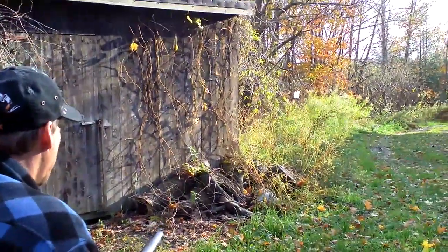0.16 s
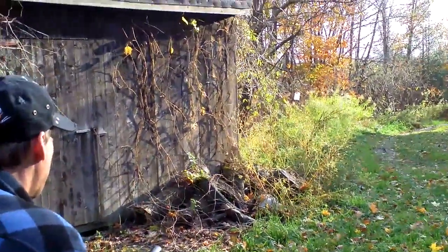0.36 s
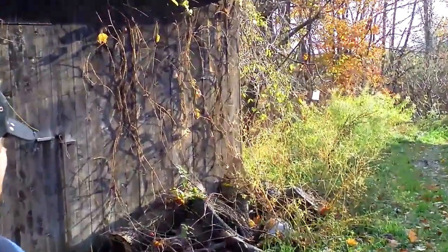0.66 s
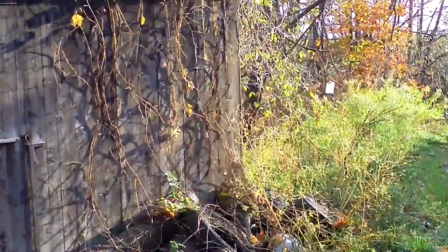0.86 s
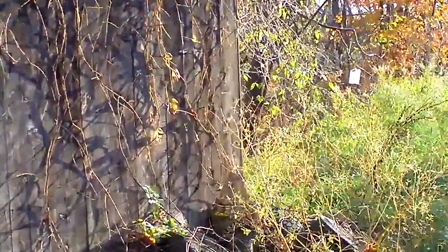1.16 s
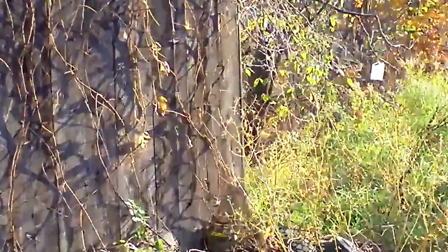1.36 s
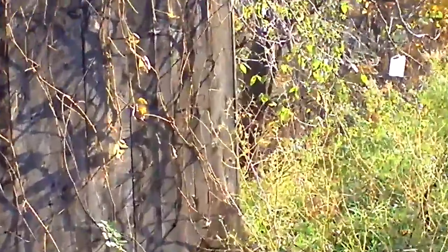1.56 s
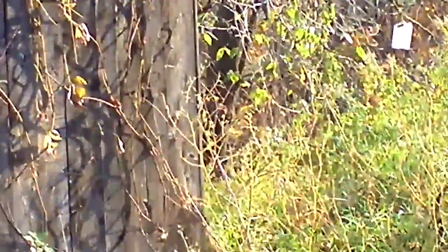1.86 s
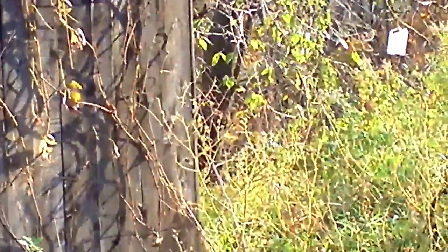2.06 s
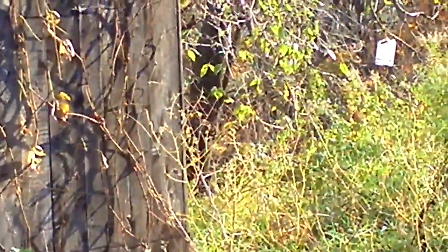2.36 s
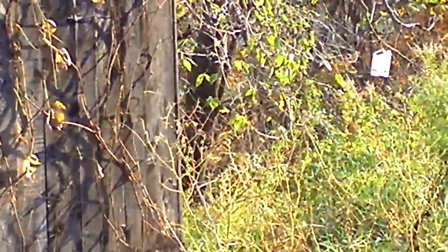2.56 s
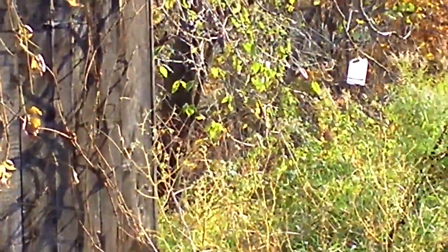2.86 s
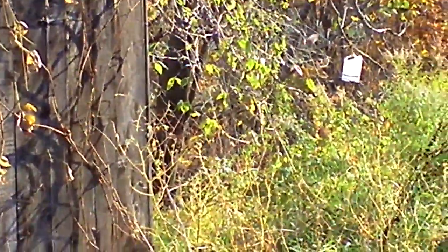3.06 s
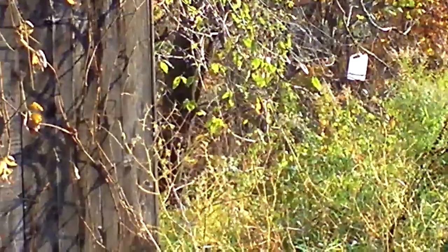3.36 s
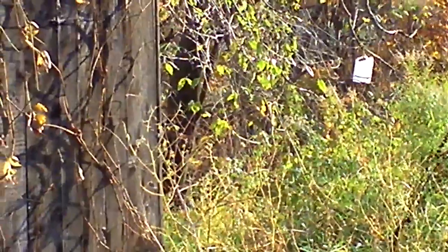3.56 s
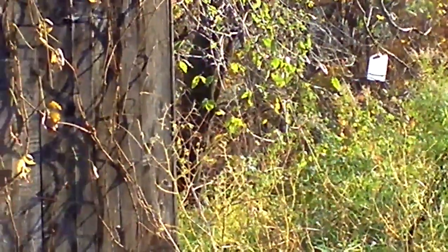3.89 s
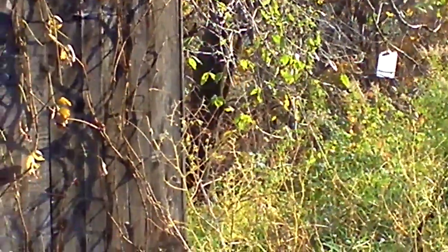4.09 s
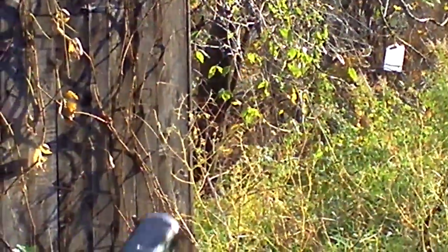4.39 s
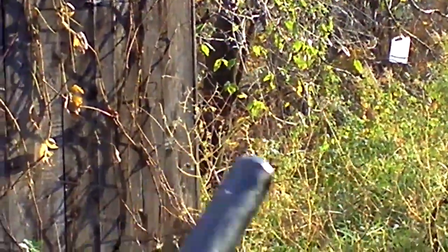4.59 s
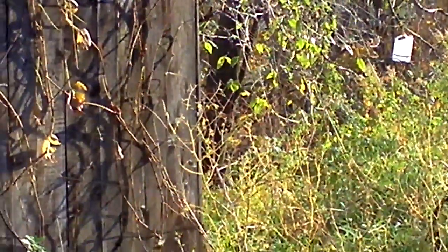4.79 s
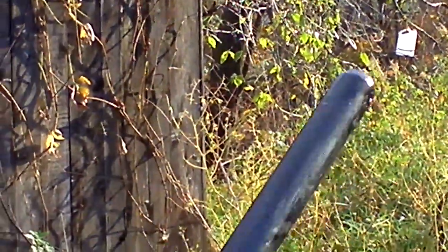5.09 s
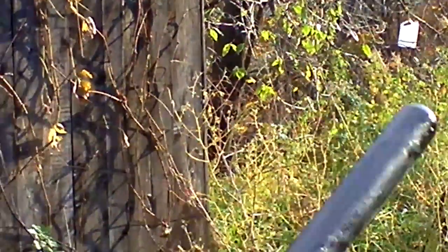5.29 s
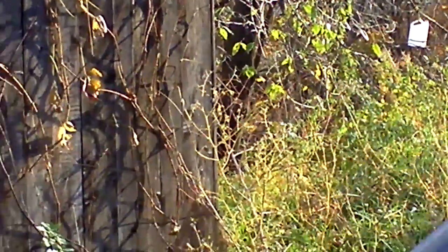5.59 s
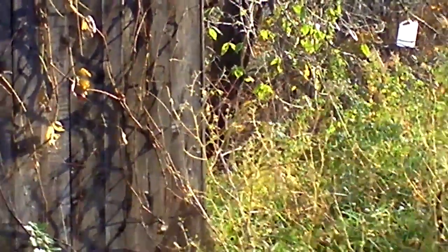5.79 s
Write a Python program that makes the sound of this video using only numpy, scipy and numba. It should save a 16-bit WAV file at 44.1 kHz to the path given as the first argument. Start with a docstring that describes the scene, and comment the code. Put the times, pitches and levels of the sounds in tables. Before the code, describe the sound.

Outdoors beside a wooden barn, a few small ticks sound over faint far traffic. About three seconds in, a homemade potato cannon fires with one sharp, loud bang. The barn and woods throw it back as a whoosh that grows duller, while the potato crashes briefly through dry brush. Soft rustles, scrapes and clicks follow close by. The microphone, a step away, overloads on the bang and dips in level.

```python
"""Potato cannon beside a barn

A home-made cannon fires a potato, which whoops up the barrel and pops out in a roar of gas.
A wooden barn and the woods throw the blast back as a whoosh that grows duller, and the potato
crashes through dry brush. Small parts tick and something rustles close by, over faint far traffic.
A small camera a step away is overloaded by the bang and turns itself down."""
import sys
import numpy as np
from scipy import signal
from scipy.fft import rfft, irfft, next_fast_len
from scipy.io import wavfile
from scipy.ndimage import uniform_filter1d
from numba import njit

SR = 44100
rng = np.random.default_rng(int(sys.argv[2]) if len(sys.argv) > 2 else 0)


def log_audio(samples):
    """Write samples as a 16-bit WAV file to the path given in sys.argv[1]."""
    # one column per channel
    frames = np.atleast_2d(samples).T
    # limit to full scale, then quantise
    limited = np.clip(frames, -1, 1)
    pcm = np.round(limited * 32767).astype(np.int16)
    wavfile.write(sys.argv[1], SR, pcm)


N = 261954
TIME = np.arange(N) / SR
POP_S = 3.0612  # the potato leaves the barrel


def undb(db):
    """Turn decibels into a multiplier."""
    return 10 ** (np.asarray(db) / 20)


def unit(x):
    """Scale x to an average (rms) size of 1."""
    return x / np.sqrt(np.mean(x ** 2))


def wobble(rate):
    """Glide to a new random value `rate` times a second."""
    k = max(int(SR / rate), 1)
    steps = np.repeat(rng.standard_normal(N // k + 1), k)
    return unit(uniform_filter1d(steps, k)[:N])


def curves(table):
    """Join each column's points over time; add a gate that is open from first row to last."""
    times, *columns = np.transpose(table)
    gate = (TIME > times[0]) & (TIME < times[-1])
    return [np.interp(TIME, times, c) for c in columns] + [gate]


def bursts(table):
    """Events rise, hold and fade: give their joint gain, and other columns led by the loudest."""
    start, db, rise, hold, fall, *columns = np.transpose(table)[:, :, None]
    level_db = db - rise * np.maximum(start - TIME, 0) - fall * np.maximum(TIME - start - hold, 0)
    power = undb(np.maximum(level_db, -200)) ** 2
    total = power.sum(axis=0)
    return [np.sqrt(total)] + [(power * c).sum(axis=0) / total for c in columns]


def coloured(x, colour):
    """Give the frequencies and spectrum of x, shaped by (f/Hz, level/dB) points."""
    size = next_fast_len(N, True)
    f = np.arange(1, size // 2 + 2) * SR / size
    hz, db = np.transpose(colour)
    return f, rfft(x, size) * undb(np.interp(np.log(f), np.log(hz), db))


def bands(x, colour):
    """Shape x, scale it to size 1 and split it into half octaves: (f/Hz, band) pairs."""
    f, spectrum = coloured(x, colour)
    spectrum = spectrum / np.std(irfft(spectrum))
    octave = np.clip(np.log2(f), 5, 14)
    return [(2. ** k, irfft(spectrum * np.clip(1 - 2 * abs(octave - k), 0, 1))[:N])
            for k in np.arange(5, 14.1, .5)]


@njit
def bandpass(x, hz, width):
    """Let through the sound near a pitch that may move."""
    y, band, low = np.empty(len(x)), 0., 0.
    for i in range(len(x)):
        g, k = np.tan(np.pi * hz[i] / SR), width[i] / hz[i]
        v = (band + g * (x[i] - low)) / (1 + g * (g + k))
        band, low, y[i] = 2 * v - band, low + 2 * g * v, k * v
    return y


@njit
def follow(x, attack, release):
    """Track the peaks of x, rising and falling at separate speeds."""
    y, level = np.empty(len(x)), 1e-6
    for i in range(len(x)):
        level += (abs(x[i]) - level) * (attack if abs(x[i]) > level else release)
        y[i] = level
    return y


def crackle(table, grain_db, patchy_db, width):
    """Bursts of tiny, uneven clicks around a moving pitch."""
    gain, hz = bursts(table)
    hz = np.clip(hz, 500, 12000)
    grains = rng.standard_normal(N) * undb(grain_db * rng.exponential(size=N) + patchy_db * wobble(150))
    return gain * unit(bandpass(bandpass(grains, hz, width * hz), hz, width * hz))


# Bass-to-treble balance of the background: f/Hz, level/dB
BACKGROUND_COLOUR = [(20, -1.5), (50, -9), (120, -0.5), (200, -1), (330, 0.5), (500, -3), (1000, -6),
                     (2000, -9.5), (4000, -13), (7000, -18.5), (11000, -15.5), (13000, -16), (15500, -5.5)]
def background(level_db=-47.5):
    """Far traffic rumbles and air hisses; the bass flickers more than the treble."""
    swell_db = 0.5 * wobble(0.88)
    parts = bands(rng.standard_normal(N), BACKGROUND_COLOUR)
    return undb(level_db) * sum(band * undb(swell_db + min(300 / hz, 1) ** .5 * wobble(6.7))
                                for hz, band in parts)


# Soft rustles and thin scrapes, both as: t/s, level/dB, rise/(dB/s), hold/s, fall/(dB/s), f/Hz
RUSTLES = [(4.5, -65.5, 146, 0.0012, 170, 3000), (4.552, -51, 427, 0.0011, 170, 3000),
           (4.596, -51, 500, .001, 600, 3500), (4.63, -58.5, 300, .07, 100, 5030),
           (4.74, -50, 120, 0.051, 800, 4570), (5.385, -49.5, 54, 0.0091, 330, 2640),
           (5.65, -47.5, 800, 0.043, 150, 3090), (5.755, -50, 145, 0.02, 198, 3550)]
SCRAPES = [(4.368, -58, 900, 0.0064, 900, 4770), (4.549, -57, 1502, 0.0092, 900, 2250),
           (4.73, -58, 300, .06, 903, 4900), (5.648, -54, 900, 0.111, 600, 2250),
           (5.778, -54, 900, .014, 900, 1150)]
def rustle_and_scrape():
    """Something rustles close by as the barrel swings, and something scrapes with a slight ring."""
    rustle = crackle(RUSTLES, grain_db=1.3, patchy_db=0.95, width=2.2)
    scrape = crackle(SCRAPES, grain_db=2.5, patchy_db=2.2, width=.22)
    return rustle + scrape


# Small parts ticking, twigs snapping and, at 3.136 s, the echo's first hard slap:
# t/s, level/dB, ring/Hz, second ring/Hz, second ring/dB, fade/s, thud/dB, thud/Hz, edge/dB, fuzz/dB
SMALL_HITS = [(0.24, -35, 2350, 3330, -1.5, 0.02, -3.5, 280, 0, 2.5),
              (0.2888, -37.5, 2550, 3250, 0, 0.033, -22, 600, -20, -2),
              (0.331, -48, 2520, 3300, 3, 0.011, 0, 400, -20, 2),
              (0.3857, -30.5, 1980, 2900, 3, 0.0078, -3, 510, 11, 12),
              (1.9144, -39.5, 1680, 2400, -7, 0.0079, -1.5, 516, -16, 8.5),
              (2.9583, -23, 3040, 4400, -14, 0.0067, -42, 670, -14, 4.5),
              (2.962, -35.5, 3080, 4300, -14, 0.055, -20, 670, -11, 5.5),
              (3.136, 0.5, 1420, 4360, -7, 0.022, -2.5, 470, -6, 1),
              (3.5861, -23.5, 3300, 6440, 2, 0.016, 12, 830, 8, 12),
              (3.6285, -17.5, 3799, 4470, 1, 0.013, -6, 800, -23, 2),
              (3.656, -27, 5500, 7200, -5, .01, -18, 900, -8, 8),
              (3.671, -22, 5800, 6400, -5, .01, 1, 900, -18, 1),
              (3.7585, -38, 5600, 6400, 0, .012, -20, 900, -20, 3),
              (3.7693, -36, 4200, 5400, 0, .012, -20, 900, -20, 3),
              (3.863, -26, 2300, 1600, 4, 0.011, -16, 600, -10, 6),
              (3.8862, -30, 4200, 5200, 5, 0.012, -24, 900, -20, 4),
              (4.0464, -37, 1070, 1490, -3, .03, 5, 429.4, -28, 5),
              (4.5015, -44, 2260, 3050, -1, 0.017, -15, 655, -25, 0),
              (4.548, -42.5, 2150, 2970, -5, 0.019, -3, 560, -16, 3),
              (4.593, -42, 2200, 3400, 0, 0.018, -21, 604, -6, 6),
              (5.58, -20.5, 2300, 3300, -12, 0.014, -20, 1432, -2.5, -4),
              (5.8866, -36.5, 2130, 3420, 0, 0.0063, -14, 703, 8, 6),
              (5.9138, -32, 3950, 5400, -7.5, 0.012, -8, 1920, -3.5, 0.5)]
def ticks():
    """Each hit is two ringing notes, a fuzz of noise around them, a bright edge and a dull thud."""
    length = 2048
    out, t, flat = np.zeros(N + length), np.arange(length) / SR, np.ones(length)
    rise = 1 - np.exp(-t / 0.000062)  # the contact takes a moment
    for start, db, hz, second_hz, second_db, fade_s, thud_db, thud_hz, edge_db, fuzz_db in SMALL_HITS:
        noise = rng.standard_normal(length)
        fade = 1000. ** (-t / max(fade_s, .002))
        notes = np.sin(2 * np.pi * hz * t) + undb(second_db) * np.sin(2 * np.pi * second_hz * t)
        ring = (1.2 * fade ** 3 + 0.31 * fade) * notes  # a hard snap, then a weaker ring
        centre = hz * flat
        fuzz = fade * bandpass(bandpass(noise, centre, 2.4 * centre), centre, 2.4 * centre)
        edge = 2.0 * fade ** 2.4 * bandpass(noise, 7500 * flat, 6000 * flat)
        thud = 1000. ** (-t / 0.025) * np.sin(2 * np.pi * thud_hz * t)
        hit = ring + undb(fuzz_db) * fuzz + undb(edge_db) * edge + undb(thud_db) * thud
        i = int(start * SR)
        out[i:i + length] += undb(db) * rise * hit
    return out[:N]


# Crashes in the brush: t/s, level/dB, rise/(dB/s), hold/s, fall/(dB/s), f/Hz
BRUSH_CRASHES = [(3.588, -27.5, 4000, .001, 300, 5000), (3.63, -29.5, 350, 0.034, 170, 3900),
                 (3.758, -43.5, 600, .012, 200, 5000), (3.8, -45.5, 604.5, 0.0009, 100, 5000),
                 (3.859, -28, 1200, 0.0067, 700, 2510), (3.885, -30, 497, 0.027, 552, 3330),
                 (3.925, -38.5, 300, .001, 97, 3030)]
def dry_brush():
    """The potato tears through dry twigs and leaves."""
    return crackle(BRUSH_CRASHES, grain_db=2.95, patchy_db=1.7, width=1.48)


# Echoes off the barn, near trees and far woods: t/s, level/dB, rise/(dB/s), hold/s, fall/(dB/s)
ECHOES = [(3.068, -1, 4992.5, .001, 450), (3.076, -7, 900, 0.017, 450), (3.139, -6.5, 1500, 0.05, 59.5),
          (3.265, -3, 60, 0.037, 96), (3.45, -18, 150, 0.051, 107), (3.6, -23, 300, 0.025, 39),
          (3.865, -34, 200, 0.048, 70), (4.04, -42, 200, .05, 49)]
# Their bass-to-treble balance: f/Hz, level/dB
ECHO_BALANCE = [(20, -30.5), (35, -9), (52, -0.5), (130, 2.5), (200, -1.5), (270, -2), (340, -7), (600, -2),
                (800, -7), (1080, -1.5), (1300, -8), (1500, -2), (1800, -7.5), (2450, -5), (2900, -7),
                (3300, -9), (3800, -12), (4800, -9.5), (5500, -16), (7000, -16), (10000, -23.5),
                (15000, -24.5)]
# The pitch above which the air dulls them: t/s, f/Hz
DULL_ABOVE = [(3.1, 10400), (3.3, 6500), (3.5, 3830), (3.7, 2700), (4.0, 1850), (4.4, 1516)]
def echo(air_db_per_octave=13, boom_s=3.22, boom_spread_s=0.043):
    """The blast scatters back; later echoes have gone further, so the air has taken more treble."""
    gain, = bursts(ECHOES)
    top_hz, _ = curves(DULL_ABOVE)
    boom = np.exp(-((TIME - boom_s) / boom_spread_s) ** 2 / 2)
    bass_db_per_octave = -2.5 + 4 * boom  # a low thump rolls back, then thins
    noise = rng.standard_normal(N) * undb(1.4 * wobble(400) + wobble(60))
    out = 0
    for hz, band in bands(noise, ECHO_BALANCE):
        air_db = -air_db_per_octave * np.log2(1 + (hz / top_hz) ** 4) / 4
        bass_db = bass_db_per_octave * np.clip(np.log2(500 / hz), 0, 2)
        flicker_db = 0.44 * wobble(25) + 0.5 * wobble(7)
        out = out + band * undb(air_db + bass_db + flicker_db)
    return (TIME > POP_S) * gain * out  # nothing returns before the blast


# Pressure building behind the potato: t/s, whoop level/dB, roar level/dB
FIRING = [(3.0224, -55, -71), (3.0295, -42, -60), (3.0318, -35, -40), (3.036, -27, -35), (3.044, -33, -30),
          (3.052, -18.5, -15.5), (3.0555, -4.5, -25.5), (3.0572, 6.5, -7), (3.0595, 12.5, 4),
          (3.063, 1, 11), (3.0655, -6.5, -1.5), (3.072, -56.5, -12.5)]
# Bass-to-treble balance of the gas roar: f/Hz, level/dB
ROAR_COLOUR = [(30, -30), (90, -10), (200, 6), (350, -3), (800, -16), (2200, -5.5), (3200, -11),
               (5500, -16.5), (9500, -12.5), (15000, -35)]
# Gas slipping past the potato: t/s, f/Hz, spread/s, level/dB
GAS_SQUEALS = [(3.0505, 2160, 0.0013, -15), (3.059, 5570, 0.0023, -3.5), (3.067, 3200, 0.0017, -3)]
# Notes of the empty pipe: f/Hz, level/dB, time to fade by 60 dB/s
PIPE_NOTES = [(55, 1.5, 0.041), (197, -5, 0.083), (338, 4, 0.1), (394, -1, 0.15), (600, 0, 0.027),
              (1075, 3.5, 0.039)]
def cannon(low_hz=265, high_hz=5940, launch_s=3.0229, sweep_s=3.0613, sweep_width_s=.001):
    """The air in the barrel whoops upward, gas squeals and roars out, and the emptied pipe rings."""
    whoop_db, roar_db, gate = curves(FIRING)
    # The pipe ahead of the potato gets shorter, so its note climbs to a whistle.
    climb = (1 + np.tanh((TIME - sweep_s) / sweep_width_s / 2)) / 2
    hz = low_hz + (high_hz - low_hz) * climb
    phase = 2 * np.pi * np.cumsum(hz * (TIME > launch_s)) / SR
    whoop = np.sin(phase) + 0.23 * np.sin(2 * phase) + 0.18 * np.sin(3 * phase)
    whoop *= undb(1.9 * wobble(300))
    roar = unit(irfft(coloured(rng.standard_normal(N), ROAR_COLOUR)[1])[:N])
    squeal = sum(undb(db) * np.exp(-((TIME - s) / spread) ** 2 / 2) * np.sin(2 * np.pi * f * (TIME - s))
                 for s, f, spread, db in GAS_SQUEALS)
    since_pop = np.maximum(TIME - POP_S, 0)
    ring = sum((-1) ** k * undb(db) * 1000. ** (-since_pop / fade_s) * np.sin(2 * np.pi * f * since_pop)
               for k, (f, db, fade_s) in enumerate(PIPE_NOTES))
    return gate * (undb(whoop_db) * whoop + undb(roar_db) * roar) + squeal + ring


def scene():
    """Add up all the sounds that reach the microphone."""
    return (dry_brush() + rustle_and_scrape() + cannon() + echo() + ticks() + background())[None]


# The microphone loses deep bass; its case dulls the treble and cancels a narrow band: f/Hz, level/dB
MIC_COLOUR = [(20, -13.5), (48, 2), (6800, 0), (7650, -6.5), (7880, -31), (8100, -6), (11500, -9.5),
              (13000, -20), (15500, -24)]
def record(dry):
    """The camera turns loud sound down a moment late and recovers slowly; the peaks get squashed."""
    ceiling, threshold_db, late_s, top_hz = .83, -31, 0.006, 15600
    loud_db = 20 * np.log10(follow(dry[0], attack=1 / (0.0026 * SR), release=1 / (.25 * SR)))
    late_db = np.interp(TIME - late_s, TIME, loud_db)
    gain = undb(-.48 * np.maximum(late_db - threshold_db, 0))
    squashed = ceiling * np.tanh(dry[0] * gain / ceiling)
    dulled = irfft(coloured(squashed, MIC_COLOUR)[1])[:N]
    treble_cut = signal.ellip(12, .2, 70, top_hz, fs=SR, output="sos")
    return signal.sosfilt(treble_cut, dulled)[None]


dry = scene()
out = record(dry)
log_audio(out)
```